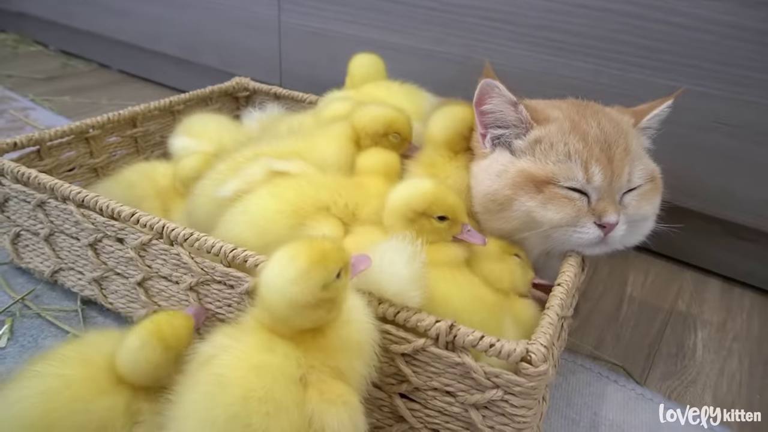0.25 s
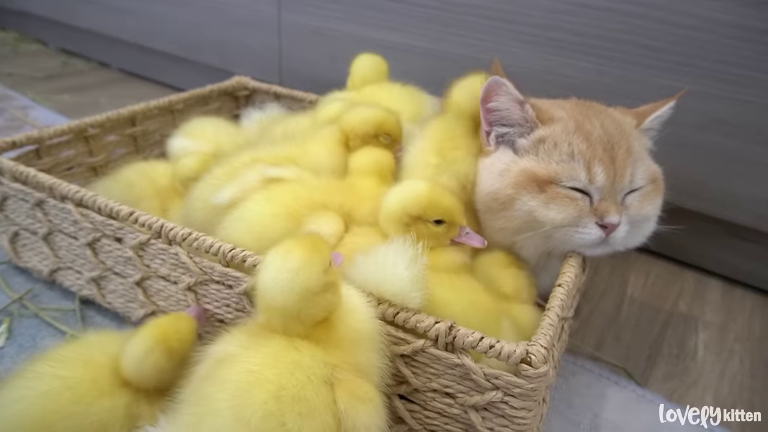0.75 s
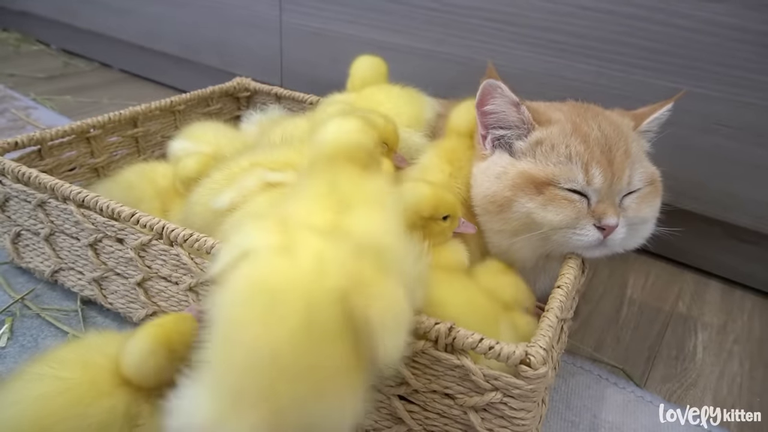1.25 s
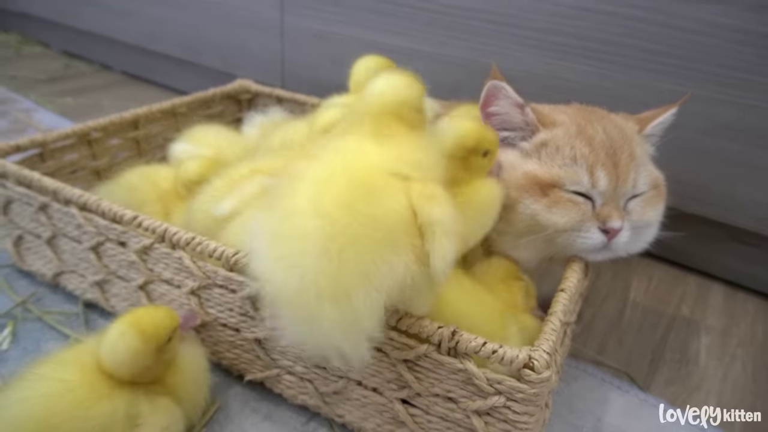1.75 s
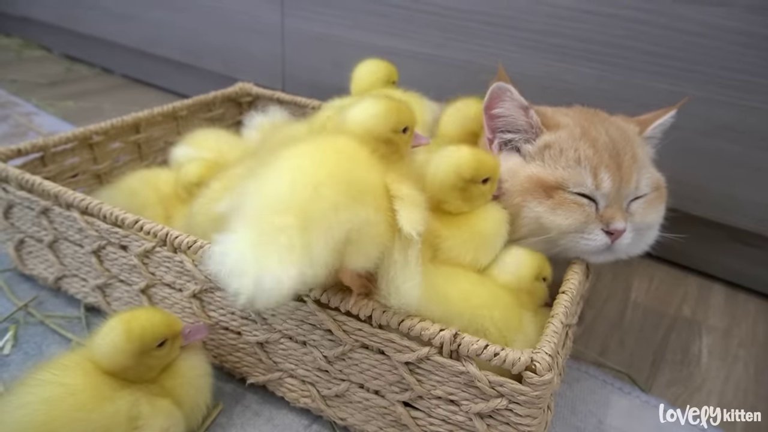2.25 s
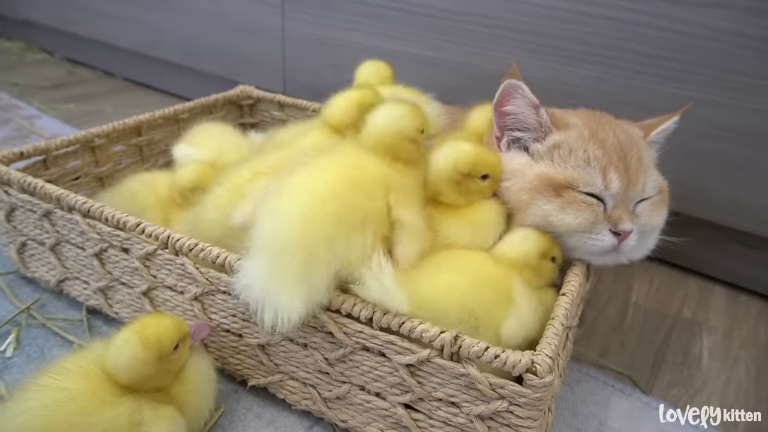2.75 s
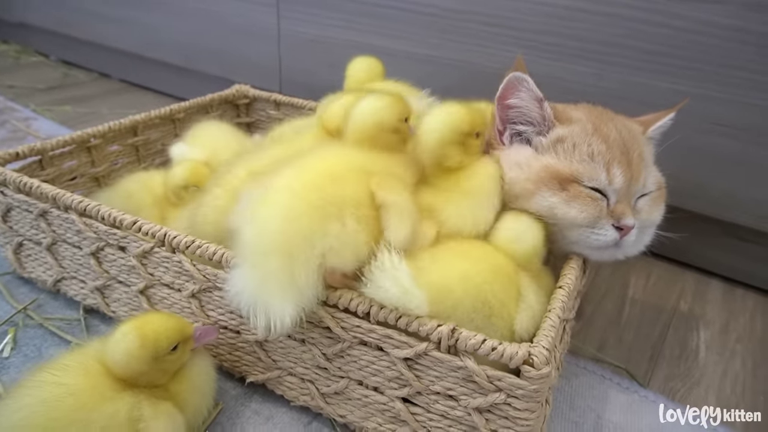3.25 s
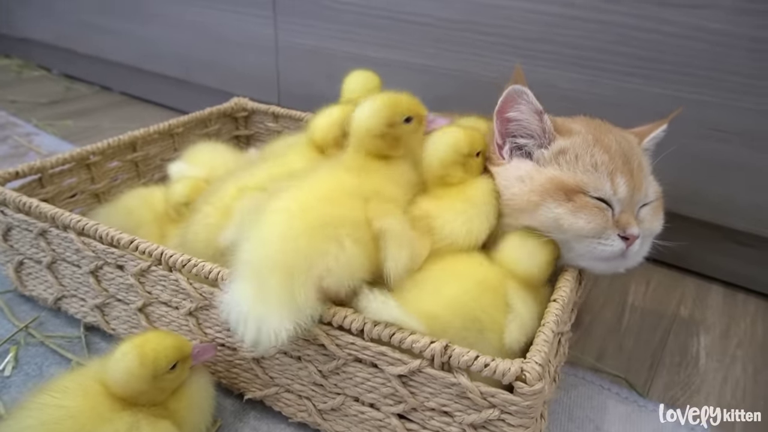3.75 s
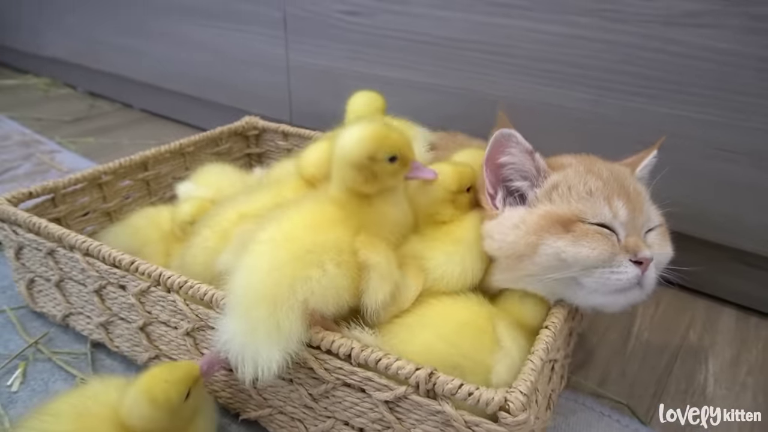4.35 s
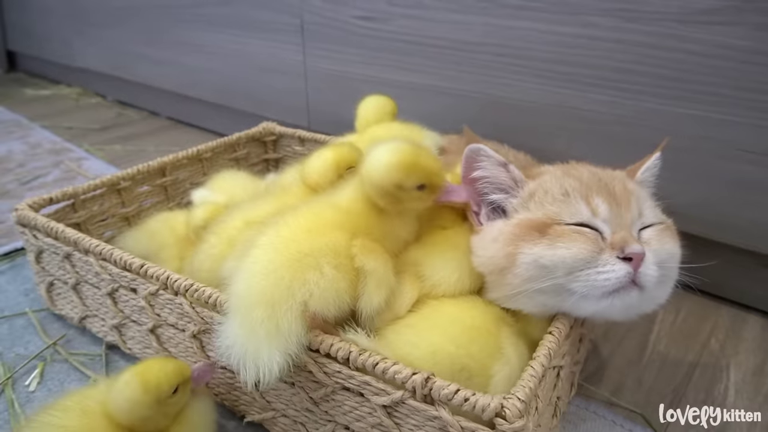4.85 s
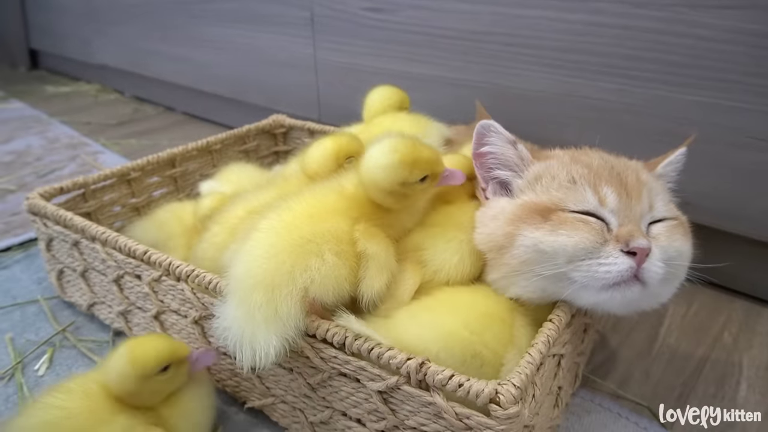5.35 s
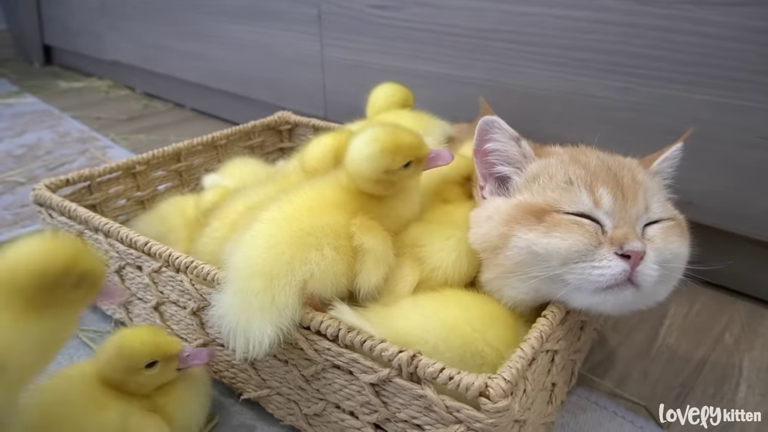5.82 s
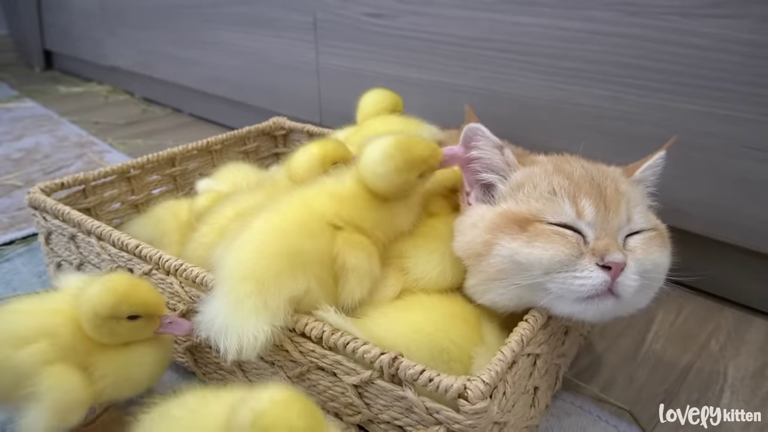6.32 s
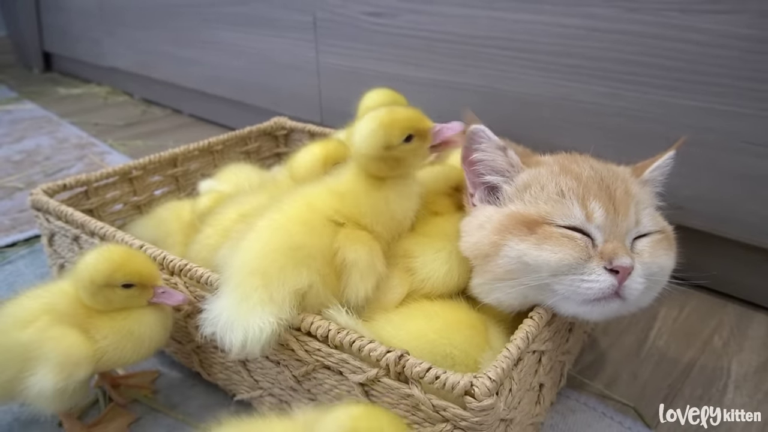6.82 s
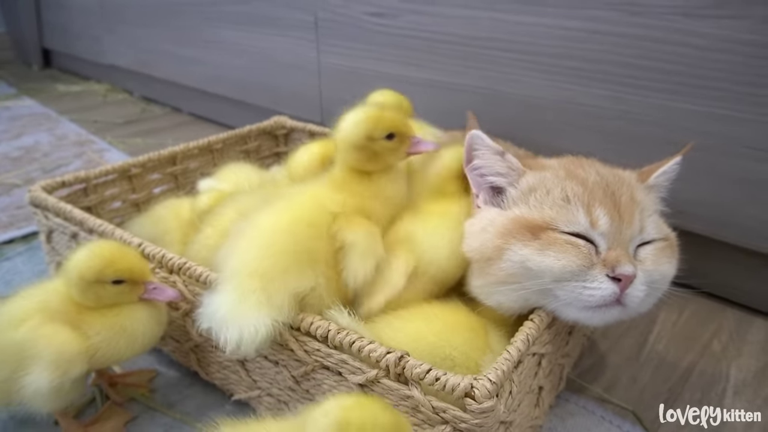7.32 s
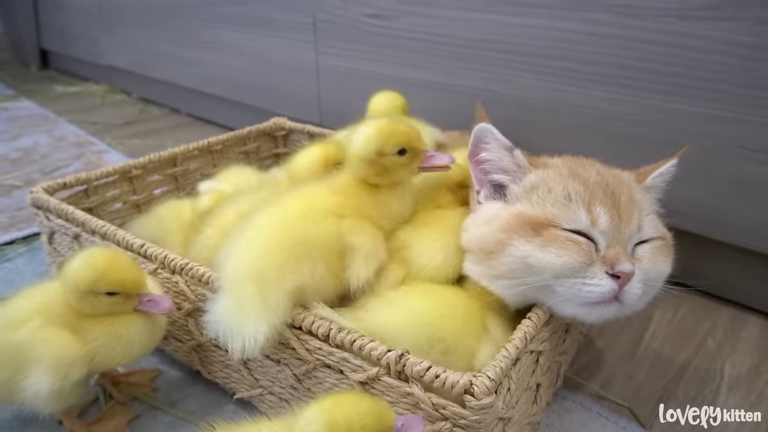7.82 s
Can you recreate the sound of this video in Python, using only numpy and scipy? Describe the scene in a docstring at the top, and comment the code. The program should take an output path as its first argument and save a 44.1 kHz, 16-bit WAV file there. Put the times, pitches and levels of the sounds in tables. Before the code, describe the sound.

Young ducklings peep sharply and close together in a small hard-floored room, with faint wicker rustles and a cat's low, soft purr underneath.

```python
"""Ducklings in a wicker basket

Ducklings peep close by in a small room with a hard floor, and a cat in the basket purrs.
Peeps and chirps are gliding tones with weak overtones; rasps are uneven pulses ringing throat and beak.
The purr is slow pulses through throat and chest resonances; feet, beaks and down tick, bump and
rustle on the wicker as shaped noise. Decaying noise tails make the room, over a steady room tone."""
import sys
import numpy as np
from scipy import signal
from scipy.fft import rfft, irfft, next_fast_len
from scipy.io import wavfile
from scipy.ndimage import uniform_filter1d, map_coordinates

SR = 44100
rng = np.random.default_rng(int(sys.argv[2]) if len(sys.argv) > 2 else 0)


def dump(signal):
    """Clip the signal to [-1, 1] and save it as 16-bit WAV at the path in sys.argv[1]."""
    limited = np.clip(np.atleast_2d(signal).T, -1, 1)
    pcm = np.round(limited * 32767).astype(np.int16)
    wavfile.write(sys.argv[1], SR, pcm)


N = 356328


def amp(db):
    """Decibel law: 20 dB is a factor of ten in amplitude."""
    return 10 ** (np.asarray(db) / 20)


def unit(x):
    """Normalization to an rms of 1."""
    return x / np.sqrt(np.mean(x ** 2) + 1e-20)


def along(points, hz):
    """Logarithmic frequency scale: interpolate (Hz, value) points on it."""
    f, v = np.transpose(points)
    return np.interp(np.log(hz + 1), np.log(f + 1), v)


def curves(rows):
    """Linear interpolation in time: one curve for each column after the time in seconds."""
    s, *cols = np.transpose(rows)
    return [np.interp(np.arange(N) / SR, s, c) for c in cols]


def wobble(rate, size=N):
    """Band-limited randomness: a smooth curve through random knots, rate of them a second."""
    knots = rng.standard_normal(int(size * rate / SR) + 4)
    return map_coordinates(knots, [np.arange(size) * rate / SR])


def swell(t, rise, fall):
    """Linear envelope: straight fades at both ends, in seconds."""
    return np.clip((t - t[0]) / rise, 0, 1) * np.clip((t[-1] - t) / fall, 0, 1)


def filtered(x, response):
    """Linear filtering: multiply the spectrum by a response of frequency."""
    m = next_fast_len(x.shape[-1] + 8192)
    spectrum = rfft(x, m) * response(np.fft.rfftfreq(m, 1 / SR))
    return irfft(spectrum, m)[..., :x.shape[-1]]


def modes(table):
    """Modal superposition: damped resonances (Hz, width in Hz, dB) add with alternating sign."""
    def response(f):
        total = 0
        for k, (c, w, db) in enumerate(table):
            total = total + (-1) ** k * amp(db) * 1j * f * w / (c * c - f * f + 1j * f * w)
        return total
    return response


def add(pair, s, sound, pan_db):
    """Superposition: add a sound at a time, placed by its level difference, left minus right."""
    part = pair[:, round(s * SR):][:, :len(sound)]
    part += amp([[pan_db / 2], [-pan_db / 2]]) * sound[:part.shape[1]]


def pulses(rate, jitter, scatter_db):
    """Relaxation oscillation: a pulse at each whole cycle, with scattered periods and sizes."""
    cycles = np.cumsum(rate * np.exp(jitter) / SR)
    ticks = np.diff(np.floor(cycles), prepend=0)
    return ticks * amp(scatter_db * rng.standard_normal(len(ticks)))


def rush(spectrum, patchy_db):
    """Partly coherent noise: shaped stereo noise of rms 1, with random gain over time and frequency."""
    # Each row: frequency in Hz, likeness of left and right (1 is identical)
    alike = [(50, .995), (200, .95), (500, .7), (2000, .4), (10000, .2)]
    z = signal.stft(rng.standard_normal((2, N)), nperseg=512)[2]
    field = uniform_filter1d(rng.standard_normal(z.shape[1:]), 8, 0)
    field = uniform_filter1d(field, 6, 1)
    pair = signal.istft(z * amp(patchy_db * unit(field)), nperseg=512)[1][:, :N]

    def mid_side(hz):
        turn = np.arccos(np.clip(along(alike, hz), -1, 1)) / 2
        return amp(along(spectrum, hz)) * [np.cos(turn), np.sin(turn)]

    mid, side = filtered(pair, mid_side)
    return unit(np.array([mid + side, mid - side]))


def room_tone():
    """Stationary noise: a steady background with most of its power at low frequencies."""
    # Each row: frequency in Hz, relative spectral level in dB per Hz
    air = [(15, -58.5), (30, -12), (50, 8.5), (65, -11), (130, 7), (230, -11), (510, -7.5), (1700, -16),
           (4000, -11.5), (6100, -38), (10000, -40.5), (15800, -63)]
    return amp(-65.5) * rush(air, patchy_db=-1.5)


def room(x):
    """Diffuse reverberation: a new decaying tail for each 0.25 s, since the birds keep moving."""
    # Each row: frequency in Hz, time to decay by 60 dB in seconds
    decay_times = [(300, 0.51), (3000, 0.17), (6000, 0.22), (12000, 0.23)]
    out, step = np.zeros((2, N + SR)), SR // 4
    for a in range(0, N, step):
        hz, t, z = signal.stft(rng.standard_normal((2, SR // 3)), SR, nperseg=128)
        decay = amp(-60 * t / along(decay_times, hz)[:, None])
        tail = signal.istft(z * decay, SR, nperseg=128)[1]
        wet = signal.fftconvolve(x[None, a:a + step], tail / np.linalg.norm(tail[0]), axes=1)
        out[:, a + 130:][:, :wet.shape[1]] += amp(-4.0) * wet  # starts 130 samples late
    return out[:, :N]


def purr():
    """Source and filter: the cat's slow larynx pulses ring a wide throat band and a narrow chest tone."""
    # Each row: time in seconds, level of the throat band in dB, rising and falling with the breath
    throat_levels = [(0, -67.5), (.3, -58), (.85, -58.5), (1.05, -65.5), (1.5, -59), (1.85, -63),
                     (2.05, -52.5), (2.4, -62.5), (2.9, -58.5), (3.35, -68.5), (3.6, -54.5), (4.35, -67),
                     (5.0, -64), (5.22, -73.5), (5.6, -62.5), (5.97, -71), (6.05, -56.5), (6.4, -66.5),
                     (7.1, -72.5)]
    # Each row: time in seconds, level of the chest tone in dB
    chest_levels = [(0, -72), (2.9, -72.5), (3.2, -58), (3.45, -60.5), (3.7, -71), (5, -73), (5.6, -83)]
    train = pulses(26.8, 0.021 * wobble(3), scatter_db=3.0)
    train = train + 0.027 * rng.standard_normal(N)  # air between the pulses

    def throat(f):
        return modes([(190, 50, 0), (235, 70, -2), (330, 60, -8)])(f) * modes([(210, 250, 0)])(f)

    def chest(f):
        return modes([(81, 14, 0)])(f) ** 2

    throat_sound = amp(curves(throat_levels)[0]) * unit(filtered(train, throat))
    return throat_sound + amp(curves(chest_levels)[0]) * unit(filtered(train, chest))


def rustle(down):
    """Friction noise: down and feet hiss against the weave, with small random crackles."""
    # Each row: time in seconds, level in dB before the crackles and a random waver
    levels = [(0, -59), (.45, -64), (1.05, -75), (1.12, -64), (1.5, -65.5), (1.7, -69.5), (2.1, -66),
              (2.3, -70), (2.75, -54.5), (2.9, -56), (3.5, -60.5), (4.2, -59), (5.2, -54.5), (5.85, -65),
              (6.1, -60.5), (6.4, -74), (7.65, -69.5), (7.8, -61.5), (8.08, -73)]
    crackle = (rng.random((2, N)) < 90 / SR) * amp(11.5 + 3.2 * rng.standard_normal((2, N)))
    grain = 1 + signal.lfilter([1], [1, -.99], crackle) / 4  # each crackle dies within a few ms
    return amp(curves(levels)[0] + 2.2 * wobble(16)) * grain * rush(down, patchy_db=1.5)


def basket():
    """Impact excitation: feet and beaks tick on the wicker, and bodies bump its resonances."""
    # Each row: time in seconds, level in dB before the envelope and a 5.5 dB gain, left minus right in dB
    ticks = [(0.1355, -42.5, -19), (0.1762, -37, 7.5), (0.265, -42, -18), (0.3671, -39.5, -14.5),
             (0.4373, -40, 5), (1.1054, -34.5, -13), (1.4252, -42, 6), (1.4593, -35.5, -14.5),
             (1.7471, -37, -17), (2.615, -44, 3), (2.6744, -42, 1), (3.6057, -34.5, -0.5), (5.515, -35, 6),
             (5.7982, -52.5, -23.5), (5.9592, -43, -2), (6.0664, -48, -20), (6.153, -52, 2),
             (6.213, -44.5, -3), (7.7815, -47.5, 12)]
    # Each row: start in seconds, decay length in seconds (11 dB down after one length),
    # level in dB before the fades and a 5.5 dB cut, main resonance in Hz
    bumps = [(0.132, 0.057, -52.5, 720), (1.102, 0.04, -55.5, 470), (1.283, 0.044, -58.5, 314),
             (1.423, 0.043, -52, 327), (1.746, 0.032, -52, 477), (2.033, 0.013, -49, 383),
             (2.092, 0.016, -54, 826), (6.009, 0.18, -61.5, 516), (6.178, 0.038, -52.5, 423),
             (6.21, 0.027, -55.5, 587)]
    # Noise of ticks and rustle. Each row: frequency in Hz, relative spectral level in dB per Hz
    down = [(240, -8), (400, -20.5), (496, -7), (1020, -12), (1250, -10.5), (3190, 0), (4690, -6),
            (14200, -8), (15800, -19)]
    out, t = np.zeros((2, N)), np.arange(SR // 25) / SR
    for s, db, pan_db in ticks:
        crack = filtered(rng.standard_normal(len(t)), lambda f: amp(along(down, f)))
        snap = amp(-60 * t / .01) + .2 * amp(-60 * t / .05)  # a sharp snap, then the strands settle
        snap = snap * (1 - np.exp(-t / 0.0024))
        add(out, s - .001, amp(db + 5.5) * snap * unit(crack), pan_db)
    for s, length, db, hz in bumps:
        u = np.arange(round(2 * length * SR)) / SR
        slips = (rng.random(len(u)) < 200 / SR) * rng.standard_normal(len(u))
        knocks = slips + .02 * rng.standard_normal(len(u))
        knocks[20] = 1  # the first contact

        def weave(f):
            return modes([(hz, hz * .45, 0), (2.4 * hz, hz, -17)])(f) * modes([(hz, 3 * hz, 0)])(f)

        shake = unit(filtered(knocks * amp(-11 * u / length), weave))
        add(out, s, amp(db) * shake * amp(-5.5) * swell(u, 1 / SR, length / 2), -2)
    return out + rustle(down)


def tripled_tones(out):
    """Subharmonic oscillation: a clean tone near a third of the pitch, with harmonics, is added to out."""
    # Each row: start in seconds, length in seconds, level in dB before the fades,
    # pitch in Hz before a slow rise and a random waver
    tripled = [(7.05, .036, -49, 1165)]
    for s, length, db, hz in tripled:
        t = np.arange(0, length, 1 / SR)
        phase = 2 * np.pi * np.cumsum(hz * (1 + 1.0 * t + 0.023 * wobble(440, size=len(t)))) / SR
        voice = np.sin(phase) + 1.4 * np.sin(2 * phase) + np.sin(4 * phase) + .2 * np.sin(5 * phase)
        add(out, s, amp(db) * swell(t, .012, .003) * unit(voice), -2)


def rasps():
    """Irregular oscillation: membranes out of step give uneven pulses that ring the throat and beak."""
    # Each row: start in seconds, length in seconds, level in dB of the pulsed voice
    # before its 9 dB fall, flutter and fades
    breaks = [(0.041, 0.04, -40), (0.315, 0.05, -39.5), (0.66, 0.032, -47), (2.418, 0.034, -50.5),
              (2.716, 0.017, -40), (2.732, 0.035, -35), (3.009, 0.034, -36), (3.232, 0.07, -42),
              (3.271, 0.034, -35.5), (3.488, 0.048, -44.5), (3.535, 0.048, -41), (3.861, 0.046, -39),
              (3.972, 0.035, -40.5), (4.263, 0.1, -47), (4.64, 0.016, -46), (5.001, 0.022, -40.5),
              (5.523, 0.073, -48), (6.523, 0.032, -50.5), (6.802, 0.04, -38), (7.081, 0.038, -37),
              (7.353, 0.034, -35.5), (7.644, 0.04, -37), (7.995, 0.024, -40)]
    # Each row: centre in Hz before scaling, width in Hz before the response is cubed, level in dB
    resonances = [(1350, 460, -15.5), (1914, 500, -0.5), (2860, 860, -4), (3820, 520, -9.5), (4270, 690, 1),
                  (5040, 1070, -3), (6570, 670, -15.5), (8270, 2100, -15)]
    opened, closing = 0.99, .92  # scale of the throat resonances at the start and end of a rasp
    out = np.zeros((2, N))

    def throat(scale):
        def response(f):
            return sum(amp(db) * abs(modes([(c * scale, w, 0)])(f)) ** 3 for c, w, db in resonances)
        return response

    for s, length, db in breaks:
        t = np.arange(0, length, 1 / SR)
        part = t / length
        arch = 1 + .12 * np.sin(np.pi * part ** .7) - .08 * part
        train = pulses(1180 * arch, .15 * wobble(450, size=len(t)), scatter_db=2.5)
        shut = part ** 2  # the beak closes
        voice = unit((1 - shut) * filtered(train, throat(opened)) + shut * filtered(train, throat(closing)))
        # a broken strand of tone, higher when blown harder
        upper_hz = (6750 + 50 * db) * np.sqrt(arch / arch.max()) * (1 - (1 - closing) * shut)
        upper_hz = upper_hz * (1 + .022 * wobble(260, size=len(t)))
        strand = np.sin(2 * np.pi * np.cumsum(upper_hz) / SR)
        voice = voice + amp(-2 + 4 * wobble(210, size=len(t))) * strand
        level = amp(db - 9 * part + 1.95 * wobble(189, size=len(t)))
        add(out, s, level * swell(t, 0.0042, 0.0036) * voice, -1.5)
    tripled_tones(out)
    return out


def gestures(open_s):
    """Control of pitch by breath and tension: time, Hz, dB, octave boost, place and opening of each call."""
    # A peep starts soft, dips as the voice opens, swells to a crest and ends in a flick.
    # Each row: start in seconds, length in seconds, start pitch in Hz, low pitch in Hz, crest pitch in Hz,
    # flick pitch in Hz, crest level in dB, swell in dB from low point to crest, lead-in in dB under
    # the low point, octave boost in dB, left minus right in dB
    peeps = [(.005, 0.042, 4010, 3826, 3817, 4100, -27, 4, 5, -3, -2),
             (0.262, 0.056, 4090, 3520, 3657, 4330, -22, 10.5, 5.5, -7, -1),
             (0.619, .053, 3900, 3270, 3915, 4230, -31, 6.5, -1.5, 3, -1),
             (2.085, 0.06, 2890, 2990, 3540, 3620, -34.5, 4, 5, 3, -9.5),
             (2.365, 0.057, 3540, 3480, 3494, 4420, -36.5, 8, 7, 3.5, -4),
             (2.686, 0.058, 4220, 3790, 4110, 4230, -38, -1.2, -0.5, 14, 1.5),
             (2.786, 0.044, 4050, 3800, 4040, 4840, -40, -4.5, 7, 3, -2),
             (2.954, .055, 4160, 3795, 4020, 4250, -32.5, -3, 12, 3.5, -2.5),
             (3.068, 0.093, 2970, 2840, 3250, 2700, -32.5, 4.5, 8, 11, -1),
             (3.183, 0.053, 4226, 3600, 4110, 4220, -27.5, 14, 0, 12, -2.5),
             (3.44, 0.064, 3660, 3405, 3790, 4460, -26, 8.5, 11, 6, 0),
             (3.457, 0.066, 2796, 2800, 3040, 3160, -39, 2.5, 5, 9, 7),
             (3.821, 0.047, 3920, 3320, 3605, 3450, -21.5, 9, 7, 2, -1.5),
             (3.94, 0.049, 4210, 3600, 3916, 4600, -24.5, 6.5, 2, 2, -4.5),
             (4.161, 0.056, 2700, 2760, 2974, 3680, -36.5, 2.5, 8, -2, 3),
             (4.229, 0.046, 3374, 3410, 3600, 4700, -32, 0.5, -5, -3, -5),
             (4.237, 0.058, 3370, 2840, 3040, 3300, -33, 3, 8, 1, 16),
             (4.275, 0.045, 4040, 3695, 3825, 5270, -24.5, -0.5, 7, -1.5, -7.5),
             (4.559, .067, 3270, 2955, 3276, 3230, -34, 6, -1, 12, -6.5),
             (4.597, 0.049, 3880, 3580, 3740, 5000, -26, 2.3, 3, 1.5, -4.5),
             (4.868, 0.053, 3225, 2850, 3084, 4000, -32, 5, 2, 7, 11.5),
             (4.972, 0.055, 3746, 3557, 3836, 4450, -27, 3.5, 2.5, -12, -4),
             (5.172, .058, 2840, 2900, 3300, 3830, -33, 3.5, 0.5, 8, 9),
             (5.455, 0.048, 3870, 3530, 3750, 4140, -30, 8.5, 5, 6, -5),
             (5.856, 0.038, 2820, 2700, 2984, 3740, -33.5, 5.5, -3, 1, 5),
             (6.043, 0.069, 2455, 2600, 2665, 3860, -35, 10, 8, -13, 2),
             (6.392, 0.04, 3090, 3580, 3690, 4040, -34, 2, 0, 10, 9.5),
             (6.478, 0.042, 3170, 3120, 3160, 4150, -27.5, 12.5, -5.5, 4.5, 2),
             (6.754, 0.054, 3800, 3346, 3500, 3980, -22.5, 5.5, 5.5, -8.5, -3),
             (7.033, 0.053, 3900, 3464, 3594, 4120, -22.5, 3.5, 9.5, -7, -3),
             (7.3, 0.057, 3910, 3515, 3650, 4000, -19.5, 6, 6.5, -6.5, -3),
             (7.599, 0.049, 3850, 3450, 3552, 4150, -23.5, 3, 7, -10, -2),
             (7.944, 0.055, 3860, 3300, 3497, 4210, -24, 4.5, 8, -7.5, -1.5)]
    # A chirp is one glide, most often falling; bend over 1 lingers at the start, under 1 at the end.
    # Each row: start in seconds, length in seconds, first pitch in Hz, last pitch in Hz, bend,
    # first level in dB, fade in dB, left minus right in dB
    chirps = [(0.073, 0.021, 4410, 2310, 1.07, -33, 6.5, .1),
              (0.355, 0.019, 4420, 2520, 0.69, -32.5, 19, -1.5),
              (0.645, 0.054, 3354, 3340, 1.05, -36.5, 26, -1.8),
              (0.676, 0.025, 4220, 2740, 2.4, -44, 0.5, -.2), (1.764, 0.035, 3730, 2730, 0.72, -37, 8, 6),
              (1.887, 0.045, 3770, 2770, 0.6, -33.5, 15, 7),
              (2.131, 0.035, 3010, 2270, 0.96, -43.5, 10.5, 7),
              (2.282, 0.036, 3240, 2670, 1.2, -58, -7.5, 12), (2.418, 0.032, 4130, 2620, 2.6, -43, -3.5, 2),
              (2.457, 0.028, 2870, 3870, 1.1, -44, 4.5, -6),
              (2.765, 0.011, 3520, 2840, 0.79, -39.5, -8.5, -3),
              (2.798, 0.025, 3030, 2820, 0.92, -43, 11, 15),
              (2.834, 0.023, 4670, 3410, 1.6, -46.5, -10, -.4),
              (2.919, 0.029, 2460, 3140, 1.04, -50.5, -5, 9), (2.948, 0.014, 2780, 4300, 1.3, -34, 4, -4),
              (3.037, 0.02, 3730, 3000, 1.2, -44, 3, -3.6), (3.13, .02, 3214, 3800, 0.87, -59, -21, 2),
              (3.143, 0.039, 3830, 2810, 1.8, -35.5, 4.5, -1),
              (3.234, 0.042, 4210, 3530, 3, -37.5, 1.5, -1.1),
              (3.308, 0.013, 4470, 2700, 1.36, -41.5, 0, -.7),
              (3.499, 0.024, 4215, 3120, 2.05, -30.5, 1, -1),
              (3.523, 0.038, 3930, 2354, 0.65, -39.5, 0, 2.1),
              (3.578, 0.011, 4270, 2860, 1.15, -37, 15, -.4), (3.67, 0.054, 3755, 4150, 0.86, -42, -10, -6),
              (3.725, 0.027, 4110, 2320, 2.1, -33.5, 9, -5), (3.817, 0.035, 2800, 3050, 2, -45.5, -10, 7),
              (3.867, 0.044, 2500, 3108, 0.68, -52.5, -18.5, 17),
              (3.91, 0.035, 3096, 2960, 1, -36.5, 20, 20), (3.993, 0.025, 4700, 2360, 3.3, -34, 8.5, -3),
              (4.217, 0.025, 3670, 2510, 1.2, -35.5, 12, 2.5),
              (4.323, 0.018, 5240, 3450, 4.2, -36.5, 10, -6), (4.643, .022, 4900, 3500, 2.6, -33.5, 19, 0),
              (4.651, 0.033, 2790, 3013, 1.05, -46, -5, 2), (4.698, 0.014, 3220, 2240, 0.95, -46.5, 3, -.6),
              (4.919, .024, 3960, 2530, 2.28, -41.5, 0, 11), (5.023, 0.021, 4410, 2400, 1.7, -42.5, -1, -7),
              (5.231, 0.027, 4050, 2310, 2, -36.5, 7, 7), (5.499, 0.02, 3210, 3110, 1.3, -44, -6, 15),
              (5.497, 0.035, 4290, 2590, 2.16, -36.5, -3.5, -5.5),
              (5.532, 0.033, 3780, 4090, 1.03, -38, 9, 21.5), (5.57, 0.012, 3430, 2510, 0.82, -40, 5, 8),
              (5.897, 0.021, 3600, 2400, 1.23, -39, 3, -2), (6.422, 0.022, 4030, 3780, 1.3, -40, 0, 14),
              (6.437, 0.013, 3580, 2530, 0.71, -40, 10.5, 14), (6.52, 0.012, 3760, 4180, 1.3, -24, 21, -4),
              (6.535, 0.031, 4050, 2320, 3.8, -29.5, 9.5, -1),
              (6.836, 0.014, 4330, 2170, 1.26, -32, 12, -4), (7.117, 0.0079, 3700, 2650, 1.4, -41, 16, -5),
              (7.383, 0.0086, 4160, 2950, 1.1, -40, 4, -6), (7.68, 0.014, 3510, 2450, 1.16, -44.5, -7, -2),
              (8.019, 0.012, 4170, 2600, 1.3, -29, 23.5, 0)]
    hold_s, dip_share, flick_s = 0.00642, 0.3596, 0.00925  # dip_share: low point over the whole length
    attack_db, flick_db = 6, 16.5  # first sound under the lead-in; loss in the flick
    scoop, still_to_swell = 0.94, 0.95  # first over start pitch; share of the swell left halfway up
    for s, length, start_hz, low_hz, high_hz, flick_hz, db, swell_db, lead_db, boost_db, pan_db in peeps:
        dip, crest, lead = dip_share * length, length - flick_s, swell_db + lead_db
        times = np.array([0, hold_s, dip - open_s, dip, (dip + crest) / 2, crest, length])
        times = np.sort(s + times)
        pitch_points = [scoop * start_hz, start_hz, low_hz, high_hz, flick_hz]
        pitch = np.interp(times, np.delete(times, obj=[2, 4]), pitch_points)
        under_db = [lead + attack_db, lead, lead, swell_db, still_to_swell * swell_db, 0, flick_db]
        yield times, pitch, db - np.array(under_db), boost_db, pan_db, s + dip
    for s, length, from_hz, to_hz, bend, db, fade_db, pan_db in chirps:
        part = np.linspace(0, 1, 10)
        pitch = from_hz + (to_hz - from_hz) * part ** bend
        yield s + length * part, pitch, db - fade_db * part, -3, pan_db, s  # octave boost -3 dB


def whistles():
    """Frequency and amplitude modulation: voice-box tones with weak overtones flutter when hoarse."""
    # Each row: time in seconds, hoarseness in nominal dB of flutter (scaled separately for each effect)
    hoarse = [(1.95, 1), (2.05, 2.1), (5.4, 2.1), (5.47, 2.5), (5.9, 2.5), (6.38, 2.1), (6.4, 3.2),
              (6.45, 3.2), (6.48, 2.3), (6.7, .6)]
    open_s = 0.0092  # the voice opens from the lead-in to the low point
    overtone_db = -24  # octave against a tone at full scale, before boost and waver
    warble_per_s, warble = 185, 0.21  # mean throb rate; depth for each dB of hoarseness over 1
    stutter_per_s, stutter = 238, 0.57  # mean rate and depth of the catches before the voice opens
    out = np.zeros((2, N))
    for s, hz, db, boost_db, pan_db, opens_s in gestures(open_s):
        t = np.arange(s[0], s[-1], 1 / SR)
        n = len(t)
        flutter_db = np.interp(t, *np.transpose(hoarse))
        excess_db = np.maximum(flutter_db - 1, 0)
        level_db = np.interp(t, s, db)

        waver = 0.0059 * flutter_db * wobble(484, size=n)
        glide = uniform_filter1d(np.interp(t, s, hz), size=150, mode="nearest")
        phase = 2 * np.pi * np.cumsum(glide * (1 + waver)) / SR
        # harder blowing, stronger octave
        octave = amp(overtone_db + boost_db + 0.1 * level_db + 2.8 * wobble(205, size=n))
        tone = np.sin(phase) + octave * np.sin(2 * phase + 0.97 * wobble(300, size=n))
        tone = tone + amp(23.6 * flutter_db - 94) * np.sin(3 * phase)

        # a slower second vibration of the membranes adds side tones
        second_phase = 2 * np.pi * np.cumsum(560 + 90 * wobble(60, size=n)) / SR
        buzz = 1 + .04 * excess_db * np.sin(second_phase)
        throb = np.cumsum(warble_per_s * (1 + 0.241 * wobble(41.7, size=n))) / SR + rng.random()
        buzz = buzz * (1 + warble * excess_db * np.sin(2 * np.pi * throb))
        catch = np.cumsum(stutter_per_s * (1 + .25 * wobble(40, size=n))) / SR + rng.random()
        still_closed = np.clip((opens_s - t) * 2 / open_s, 0, 1)
        buzz = buzz * (1 - stutter * still_closed * np.cos(np.pi * catch) ** 2)

        level = amp(level_db + 0.39 * flutter_db * wobble(621.0, size=n))
        sound = np.sqrt(2) * tone * swell(t, 0.0026, 0.0016) * buzz * level  # root 2: rms levels
        add(out, s[0], sound, pan_db)
    return out


def scene():
    """Superposition of sources: basket and birds with their reverberation, the dry purr and room tone."""
    near = whistles() + rasps() + basket()
    purr_pair = purr() * amp([[-.3], [.3]])
    return near + room(near.mean(axis=0)) + purr_pair + room_tone()


def record(dry):
    """Band limiting: only the frequencies below 15850 Hz remain."""
    return filtered(dry, lambda hz: hz < 15850)


dry = scene()
out = record(dry)
dump(out)
```